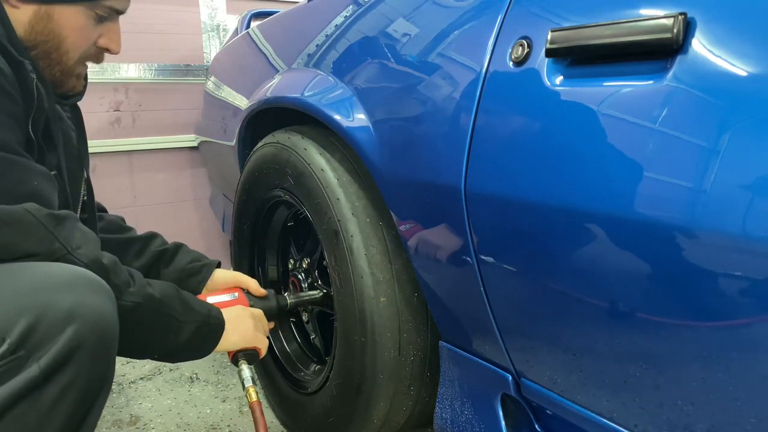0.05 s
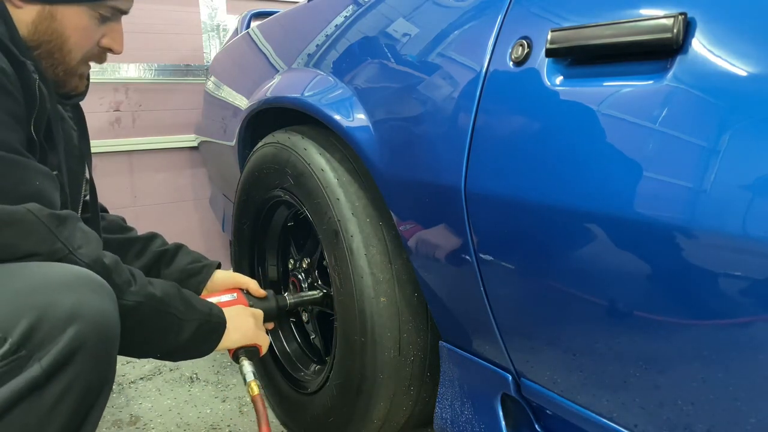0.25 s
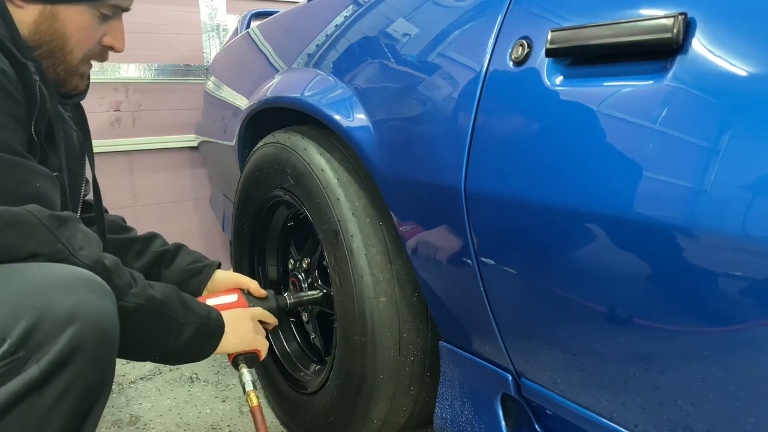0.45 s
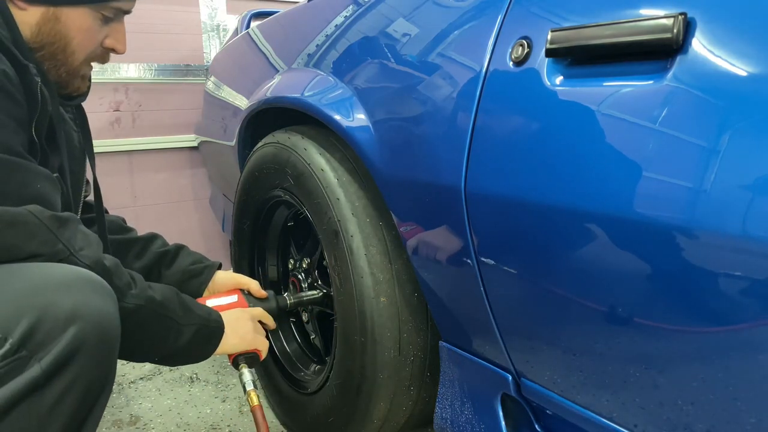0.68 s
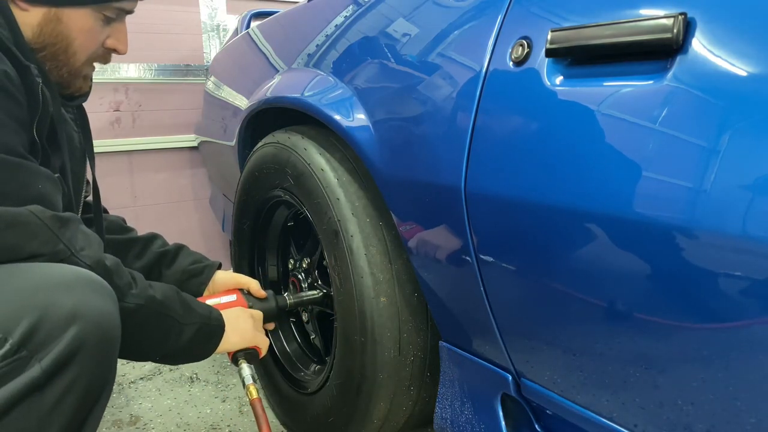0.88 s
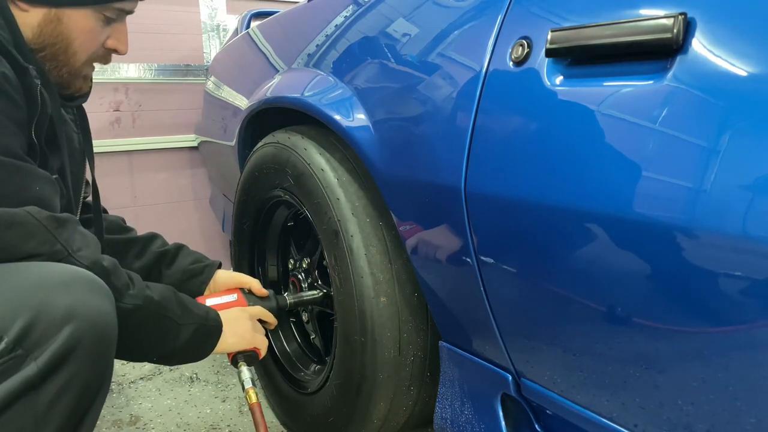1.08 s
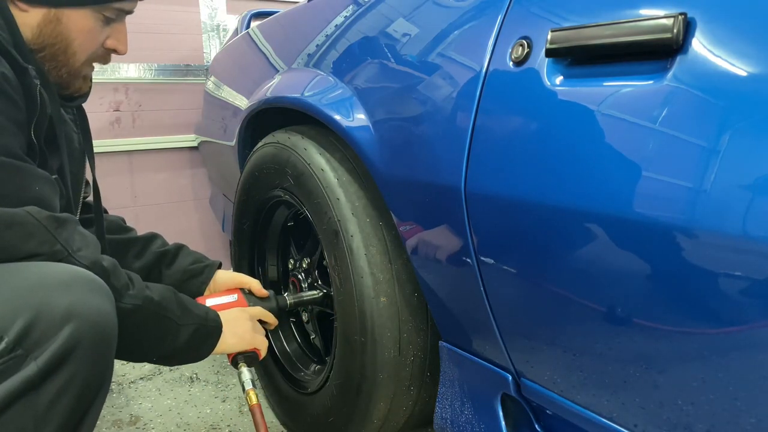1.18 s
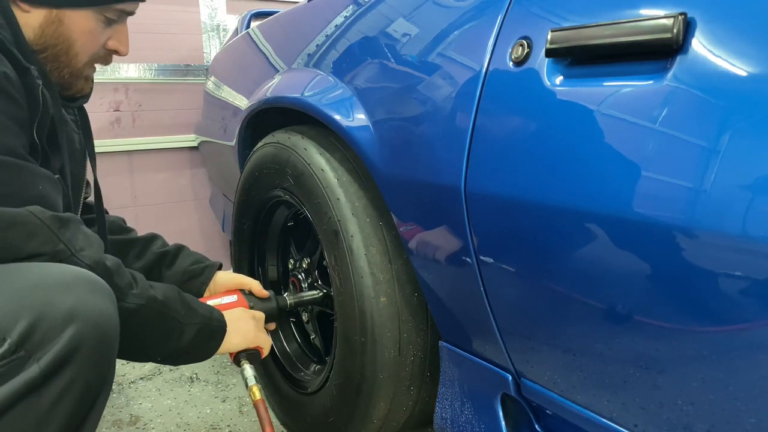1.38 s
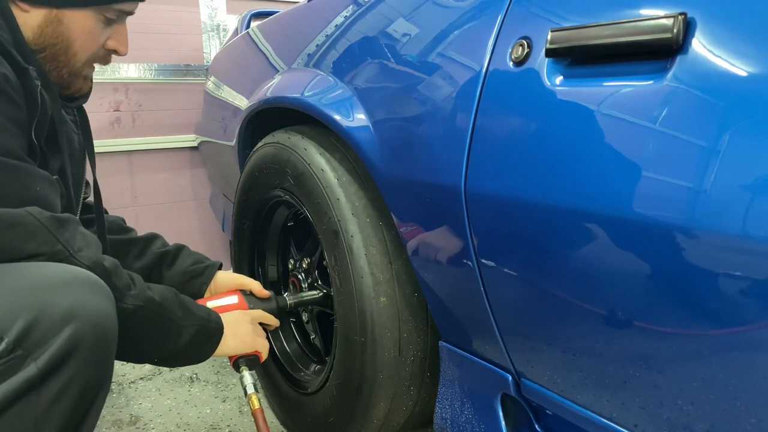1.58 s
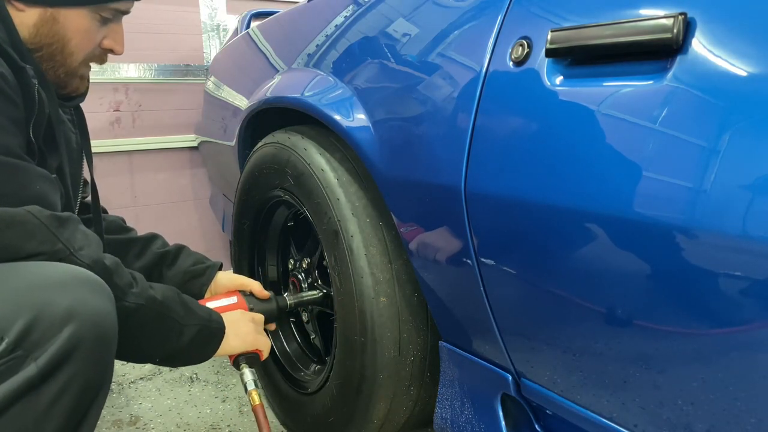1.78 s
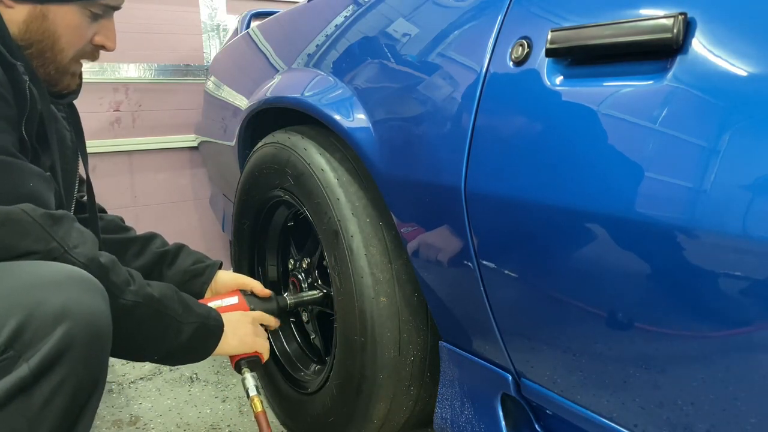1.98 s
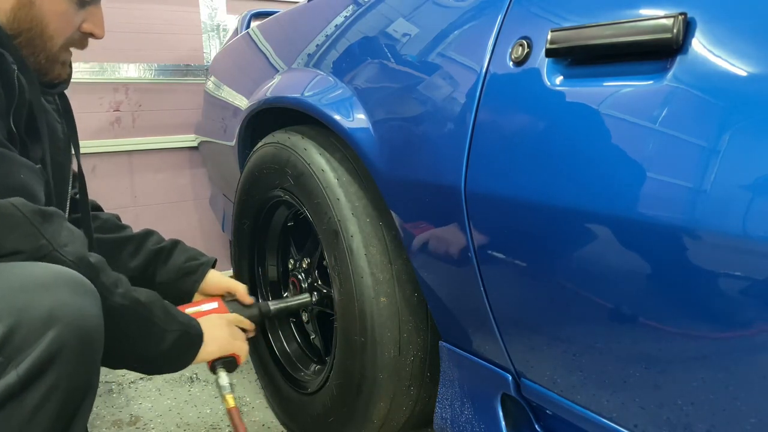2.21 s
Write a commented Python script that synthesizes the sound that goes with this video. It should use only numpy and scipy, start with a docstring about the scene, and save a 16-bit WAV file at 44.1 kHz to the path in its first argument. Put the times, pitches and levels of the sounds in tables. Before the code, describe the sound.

An air impact wrench fires four short bursts on a car wheel nut, two spinning up to a whine, two slow and hammering, with hissing air, steel clacks and short wall echoes, close stereo microphones.

```python
"""Beside a car wheel, with walls nearby: an air impact wrench runs a lug nut on in four short trigger pulls.
Twice the vane motor spins up, its puffs of air turning from thuds to a whine; then the nut is tight and it labours.
Hammer clacks are cracks of noise that ring steel modes; the exhaust is coloured noise chopped by the vanes.
The coasting socket whirrs through resonances and rattles; decaying noise makes the wall echoes over a low rumble."""
import sys
import numpy as np
from scipy import signal
from scipy.fft import rfft, irfft
from scipy.io import wavfile
from scipy.ndimage import uniform_filter1d

SR = 44100
rng = np.random.default_rng(int(sys.argv[2]) if len(sys.argv) > 2 else 0)


def generate_wav(sig):
    """Save sig (samples, or channels by samples) to the path in sys.argv[1] as 16-bit PCM at SR."""
    pcm = np.round(np.clip(np.atleast_2d(sig).T, -1, 1) * 32767).astype(np.int16)
    wavfile.write(sys.argv[1], SR, pcm)


N = 99225

# Trigger pulls. Each row: start in seconds, length in seconds, attack in seconds, level of the air flow in dB,
# sag in dB per second, level of the first spit of air in dB.
PULLS = [(0.218, 0.15, 0.013, -19, 27, -13), (0.779, 0.13, 0.017, -18, 35, -13.5),
         (1.285, 0.21, 0.026, -19.5, 28.5, -24.5), (1.77, 0.19, 0.032, -22.5, 8.5, -24.5)]


def undb(db):
    """Decibels to gain."""
    return 10 ** (np.asarray(db) / 20)


def clock():
    """Time of every sample in seconds."""
    return np.arange(N) / SR


def unit(x):
    """Scale to rms 1."""
    return x / np.sqrt(np.mean(x ** 2) + 1e-18)


def on_log(hz, points):
    """Read (Hz, value) points on a log-frequency axis."""
    p = np.array(points, float)
    return np.interp(np.log(np.maximum(hz, 1)), np.log(p[:, 0]), p[:, 1])


def colour(x, points, size=4096):
    """Causal minimum-phase filter with the given spectrum shape and unit energy."""
    log_gain = np.log(undb(on_log(np.fft.rfftfreq(size, 1 / SR), points)))
    cepstrum = irfft(log_gain)
    # folding the cepstrum forward in time makes the filter causal
    cepstrum[1:size // 2] *= 2
    cepstrum[size // 2 + 1:] = 0
    response = irfft(np.exp(rfft(cepstrum)))
    return signal.fftconvolve(x, response / np.linalg.norm(response))[:N]


def noise():
    """White noise of spread 1."""
    return rng.standard_normal(N)


def walk(rate):
    """Smooth random drift with rms 1, a new target about `rate` times a second."""
    hold = max(int(SR / rate), 1)
    steps = noise()[np.arange(N) // hold]
    return unit(uniform_filter1d(steps, hold))


def swell(start, length, attack, sag_db, release):
    """Squared attack, hold sagging by sag_db per second, exponential release."""
    age = clock() - start
    rise = np.clip(age / attack, 0, 1) ** 2
    sag = undb(-sag_db * np.clip(age, 0, length))
    fall = np.exp(-np.maximum(age - length, 0) / release)
    return rise * sag * fall


def motor(count=9):
    """Each vane lets out a puff: heavy thuds when slow, a whine when fast. Gives puffs, whine, vane count."""
    # One curve per pull. Each row: time in seconds, mean vane rate in Hz, level of the exhaust puffs in dB,
    # level of the whine in dB.
    curves = [
        [(.228, 89.25, -48, -29), (.24, 98.8, -14, -23.5), (.263, 125.7, -16, -24.5), (.28, 336.3, -18, -20.5),
         (.305, 465.6, -50, -25.5), (.33, 569.5, -35, -18), (.357, 598.4, -59, -17), (.38, 523, -44, -21.5),
         (.398, 423.2, -52, -20), (.425, 290.5, -36, -34.5), (.465, 122.4, -42, -48), (.52, 84, -68.5, -60)],
        [(.795, 95.6, -54, -36), (.811, 124.8, -9.5, -22), (.83, 191.5, -23, -22), (.856, 344, -27, -29.5),
         (.875, 382.2, -48, -28.5), (.912, 394.6, -44, -31.5), (.932, 383, -37, -50), (.965, 369.4, -38, -50),
         (1.06, 363.7, -61, -71)],
        [(1.298, 95.8, -47, -82), (1.315, 100.5, -15, -23), (1.345, 140.1, -22.5, -34),
         (1.368, 160.3, -16, -23), (1.41, 144, -28, -35), (1.455, 91.2, -21, -38), (1.505, 89.8, -27, -41),
         (1.55, 87.4, -38, -73.5)],
        [(1.778, 100.5, -35.5, -45), (1.802, 106.3, -21, -54), (1.835, 111.5, -23, -31),
         (1.895, 90.2, -27, -31), (1.955, 88.9, -19.5, -51), (2.012, 90, -35, -55), (2.04, 89.87, -51, -58)],
    ]
    # Colour of the exhaust port. Each row: frequency in Hz, gain in dB.
    port_gain = [(100, -5.5), (250, -10), (370, 2.5), (580, -6), (720, 5.5), (850, 5), (1170, 1.5),
                 (1450, 4.5), (1800, 2), (2050, -17), (2380, 3.5), (3000, -7), (5000, -21)]
    # Spectrum of the thud in each puff. Each row: frequency in Hz, relative level in dB per Hz.
    puff_spectrum = [(25, -54), (50, -7), (90, -0.5), (160, 3), (260, -3), (450, -10), (900, -21.5),
                     (2500, -6)]
    # Turbulence in each puff. Each row: frequency in Hz, relative level in dB per Hz.
    gust_spectrum = [(30, -52), (60, -4), (140, 3), (330, -5.5), (600, -6.5), (1200, -16.5), (3000, -34.5)]
    gust_db, whine_slope_db_oct = -4, -4
    whine_wobble, puff_jitter = 0.01936, .1  # spread as a share of the vane rate
    puff_scatter_db, puff_decay_cycles = 4.5, 0.47

    t, points = clock(), np.vstack(curves)
    hz = np.exp(np.interp(t, points[:, 0], np.log(points[:, 1])))
    puff_gain = whine_gain = 0
    for curve in curves:
        s, _, puff_db, whine_db = np.array(curve).T
        running = (t > s[0]) & (t < s[-1])
        puff_gain = puff_gain + running * undb(np.interp(t, s, puff_db))
        whine_gain = whine_gain + running * undb(np.interp(t, s, whine_db))
    turns = np.cumsum(hz * (1 + whine_wobble * walk(200))) / SR
    vane_count = np.cumsum(hz * (1 + puff_jitter * walk(120))) / SR

    puff_size = undb(puff_scatter_db * noise()[vane_count.astype(int)])  # one draw per puff
    flow = np.exp(-(vane_count % 1) / puff_decay_cycles) * puff_size
    thuds = unit(colour(flow - flow.mean(), puff_spectrum))
    gusts = unit(colour(flow * noise(), gust_spectrum))
    puffs = (thuds + undb(gust_db) * gusts) * puff_gain

    whine = 0
    for k in range(1, count + 1):
        level_db = on_log(k * hz, port_gain) + whine_slope_db_oct * np.log2(k) + 2 * walk(70)
        whine = whine + undb(level_db) * np.sin(2 * np.pi * k * turns)
    return puffs, whine * whine_gain, vane_count


def air_flow():
    """Air let through by the trigger: quick opening, sagging hold, short release."""
    release_s = 0.026
    return sum(undb(db) * swell(s, length, attack, sag, release_s)
               for s, length, attack, db, sag, _ in PULLS)


def hammer():
    """Steel strikes steel: a short crack, socket and wheel ring on, and the driven socket chatters."""
    # Hammer blows and socket clacks. Each row: start in seconds, level in dB.
    clacks = [(0.279, -7), (.798, -7), (0.853, -26), (0.883, -24), (0.901, -11.5), (.913, -11),
              (0.915, -12.5), (0.945, -48), (1.089, -25.5), (1.15, -40), (1.303, -13.5), (1.331, -3.5),
              (1.353, -15.5), (1.371, -11.5), (1.416, -11.5), (1.461, -9.5), (1.5244, -15), (1.526, -12.5),
              (1.573, -23.5), (1.772, -27), (1.801, -6.5), (1.815, -10), (1.864, -18), (1.909, -11.5),
              (1.957, -10.5), (1.991, -18.5)]
    # Crack of the steel. Each row: frequency in Hz, relative level in dB per Hz.
    steel_spectrum = [(100, -14), (500, 4), (1400, -3.5), (2400, 1.5), (4300, 4), (6500, 0.5), (8500, -10),
                      (10500, -4), (16000, -38)]
    # Ringing of socket and wheel. Each row: frequency in Hz, relative level in dB, 60 dB decay in seconds.
    modes = [(356, 4.5, 0.24), (530, -8.5, 0.16), (868, 29, 0.083), (1056, -43, .2), (1680, -38, .2),
             (2080, -12, 0.16), (2530, -17, 0.14), (3550, 10.5, .2), (4110, -12, 0.28), (4800, -42.5, 0.2),
             (4800, 4, 0.073), (6020, 78, 0.05)]
    clack_s, ring_db = 0.0027, -28.5
    # small knocks of the loose socket, scaled by the air flow
    chatter_per_s, chatter_db, chatter_scatter_db = 59, -1, 1.5

    t = clock()
    knock_size = undb(chatter_db + chatter_scatter_db * noise())
    knocks = (rng.random(N) < chatter_per_s / SR) * knock_size * air_flow()
    chatter = signal.lfilter([1], [1, -np.exp(-1 / (clack_s * SR))], knocks)
    blows = sum(undb(db) * (t >= s) * np.exp(-np.abs(t - s) / clack_s) for s, db in clacks)
    force = (chatter + blows) * noise()
    ring = sum(undb(db - 60 * t / t60) * np.sin(2 * np.pi * hz * t) for hz, db, t60 in modes)
    ringing = signal.fftconvolve(force, ring / np.linalg.norm(ring))[:N]
    return colour(force, steel_spectrum) + undb(ring_db) * ringing


def exhaust(vane_count):
    """Air spits as the valve opens, then hisses on, chopped by the vanes."""
    # Steady hiss. Each row: frequency in Hz, relative level in dB per Hz.
    hiss_spectrum = [(60, -14.5), (200, -13), (400, 2.5), (800, -4), (1400, -0.5), (2200, 4), (3000, -3),
                     (4600, 3.5), (6300, 3), (8400, -5), (10300, 2), (12000, -27.5), (14000, 3.5),
                     (16000, -13.5)]
    # First spit of air. Each row: frequency in Hz, relative level in dB per Hz.
    spit_spectrum = [(200, -51), (1200, -9), (2100, 16), (3000, 2.5), (5500, 5.5), (8400, 0.5),
                     (10500, 8.5), (12000, -3), (14000, 12), (16000, -17.5)]
    spit_attack_s, spit_release_s = 0.013, 0.018
    chop_depth, flutter_db = 0.13, 2

    spit = sum(undb(db) * swell(s, 2 * spit_attack_s, spit_attack_s, 0, spit_release_s)
               for s, *_, db in PULLS)
    chop = 1 + chop_depth * np.cos(2 * np.pi * vane_count)
    flutter = undb(flutter_db * walk(350))
    hiss = colour(noise() * air_flow() * chop * flutter, hiss_spectrum)
    return hiss + colour(noise() * spit, spit_spectrum)


def coasting():
    """The socket coasts on the thread: noise through resonances whirrs, flickering noise rattles, both fade."""
    # Coasts. Each row: start in seconds, length in seconds, whirr level in dB, rattle level in dB.
    coasts = [(0.385, 0.29, -37, -45.5), (1.043, 0.06, -49.5, -37.5)]
    # Resonances of the whirr. Each row: frequency in Hz, width of one of two equal stages in Hz, gain in dB.
    resonances = [(97, 102, 2.5), (411.6, 72.5, -1.5), (551.2, 95, 2), (873, 63, 3), (978, 71, 0),
                  (1230, 350, -3.5), (1660, 94, -2)]
    # Colour of the rattle. Each row: frequency in Hz, relative level in dB per Hz.
    rattle_spectrum = [(300, -0.5), (800, -0.5), (1400, -8.5), (2300, 1.5), (3500, -4.5), (4900, -1.5),
                       (6300, -6), (8500, -16), (11000, -23), (16000, -32)]
    attack_s, sag_db_s, release_s = 0.023, 13, 0.063
    rattle_flicker_db = 3

    hz = np.fft.rfftfreq(N, 1 / SR) + 1  # 1 Hz up, to avoid dividing by zero
    body = sum(undb(db) / (1 + 1j * (hz - f * f / hz) / width) ** 2 for f, width, db in resonances)
    whirr = unit(irfft(rfft(noise() * undb(1.4 * walk(90))) * body, N))
    rattle = unit(colour(noise() * undb(rattle_flicker_db * walk(400)), rattle_spectrum))
    total = 0
    for s, length, whirr_db, rattle_db in coasts:
        envelope = swell(s, length, attack_s, sag_db_s, release_s)
        total = total + envelope * (undb(whirr_db) * whirr + undb(rattle_db) * rattle)
    return total


def bump():
    """The tool is seated on the nut: a soft, dull burst of noise before the first pull."""
    # Colour of the knock. Each row: frequency in Hz, relative level in dB per Hz.
    bump_spectrum = [(40, -2), (130, 1.5), (230, -16), (400, -10), (600, -21.5), (900, -20.5), (1300, -36),
                     (3000, -38.5), (14000, -55.5)]
    start_s, level_db, decay_s = 0.0047, -37.5, 0.035
    knock = noise() * swell(start_s, .004, 0.00067, 0, decay_s)
    return undb(level_db) * colour(knock, bump_spectrum)


def walls(x, count=14):
    """Diffuse echoes that die band by band; the bass is largely alike left and right."""
    # Reverberation of the place. Each row: frequency in Hz, 60 dB decay in seconds.
    decay_times = [(80, 0.4), (220, 0.59), (600, 0.54), (1500, 0.46), (4500, 0.4), (9000, 0.41),
                   (15000, 0.093)]
    delay_s, build_s = 0.003, 0.0061
    near_db, near_s = 1, 0.0017  # first echoes from wheel well, door and ground
    shared_hz, bass_apart = 520, .2  # well below shared_hz, little of the echo differs left to right

    t, hz = clock(), np.fft.rfftfreq(N, 1 / SR)
    apart = 1 - (1 - bass_apart) * np.exp(-(hz / shared_hz) ** 2)
    sides = np.array([[1], [-1]])
    field = (rfft(noise()) + sides * apart * rfft(noise())) / np.sqrt(1 + apart ** 2)
    centres = np.geomspace(60, 16000, count)
    tail = 0
    for centre, weights in zip(centres, np.eye(count)):
        build = np.clip((t - delay_s) / build_s, 0, 1)
        fade = np.exp(-np.log(1000) * t / on_log(centre, decay_times)) * build
        near_weight = min(centre / shared_hz, 1) ** 2  # weaker in the bass
        near = np.exp(-t / near_s) * near_weight * np.sqrt(2 / (near_s * SR))
        envelope = np.hypot(fade / np.linalg.norm(fade), undb(near_db) * near)
        band = irfft(field * np.interp(hz, centres, weights), N)
        tail = tail + band * envelope
    return signal.fftconvolve(x[None], tail, axes=1)[:, :N]


def rumble():
    """Low background rumble: steady noise weighted to the deep bass."""
    # Colour of the rumble. Each row: frequency in Hz, relative level in dB per Hz.
    rumble_spectrum = [(20, 25), (40, -53), (55, 17), (100, -7), (180, -24), (400, -16.5), (900, -35),
                       (2000, -25.5), (8000, -44), (16000, -93)]
    level_db = -47.5
    return undb(level_db) * colour(noise(), rumble_spectrum)


def microphones(x):
    """Direct sound reaches the nearer left microphone first; a phase slope delays the right."""
    lead_s = 0.00011
    delay = np.exp(-2j * np.pi * np.fft.rfftfreq(N, 1 / SR) * lead_s)
    return np.array([x, irfft(rfft(x) * delay, N)])


def scene():
    """The wrench heard directly and by its echoes, over the background rumble."""
    wrench_db, air_dry_db, clack_dry_db = -2, -2.5, 0
    air_wet_db, puff_wet_db, whine_wet_db, clack_wet_db = -1, -9, -3, -2  # sent to the walls

    puffs, whine, vane_count = motor()
    blows = hammer()
    air = exhaust(vane_count) + coasting() + bump()
    motor_wet = undb(puff_wet_db) * puffs + undb(whine_wet_db) * whine
    echoes = walls(undb(air_wet_db) * air + motor_wet + undb(clack_wet_db) * blows)
    direct = microphones(undb(air_dry_db) * air + undb(clack_dry_db) * blows + whine + puffs)
    return undb(wrench_db) * (direct + echoes) + microphones(rumble())


def record(dry):
    """Each microphone has its own colour; the recorder cuts deep bass, rounds the peaks and cuts the top."""
    # Balance of the microphones. Each row: frequency in Hz, left minus right in dB.
    left_minus_right = [(60, -2), (140, -2.5), (280, 0), (500, 0.8), (1000, 2.5), (2000, 0), (4000, 4.55),
                        (8000, -0.7)]
    low_cut_hz, top_hz = 26, 15900

    difference_db = on_log(np.fft.rfftfreq(N, 1 / SR), left_minus_right)
    balance = undb(np.array([[1], [-1]]) * difference_db / 2)
    balanced = irfft(rfft(dry) * balance, N)
    low_cut = signal.butter(3, low_cut_hz, "high", fs=SR, output="sos")
    rounded = np.tanh(signal.sosfilt(low_cut, balanced))
    top_cut = signal.ellip(8, .2, 80, top_hz, fs=SR, output="sos")
    return signal.sosfilt(top_cut, rounded)


dry = scene()
out = record(dry)
generate_wav(out)
```